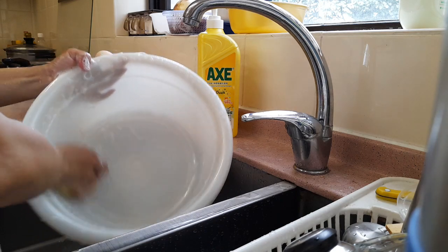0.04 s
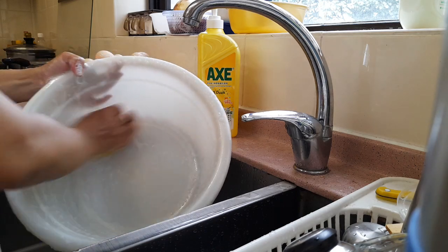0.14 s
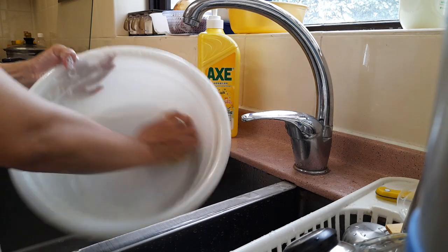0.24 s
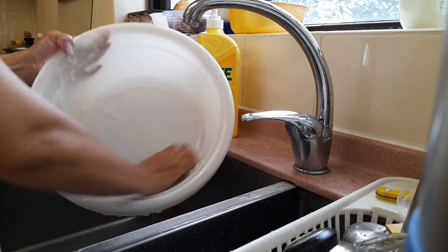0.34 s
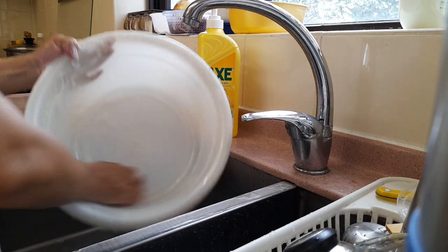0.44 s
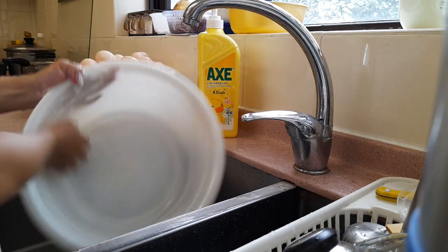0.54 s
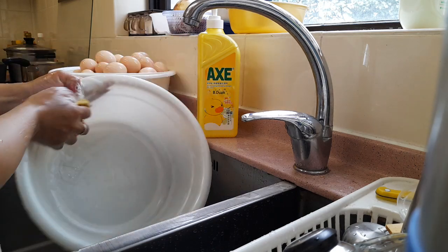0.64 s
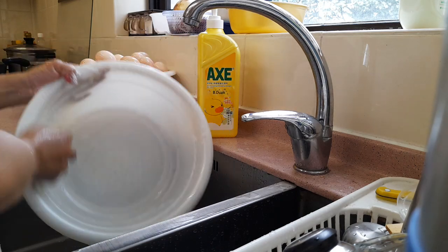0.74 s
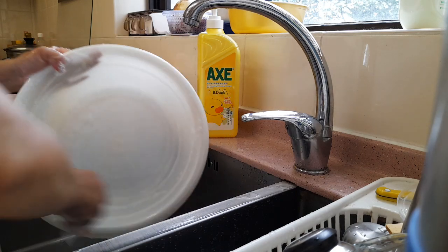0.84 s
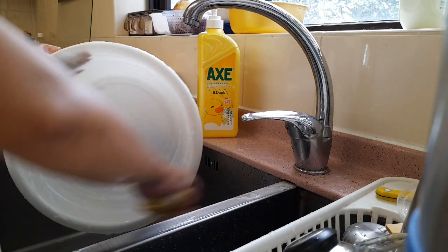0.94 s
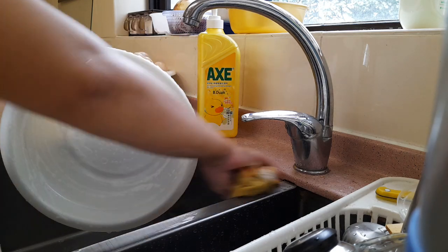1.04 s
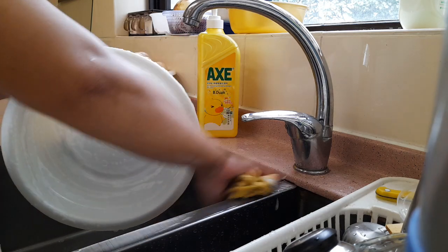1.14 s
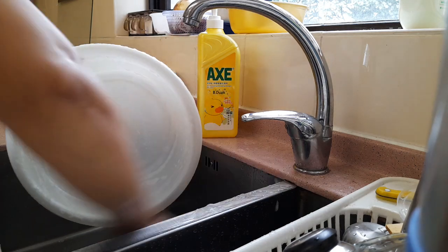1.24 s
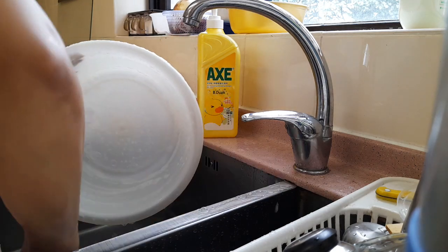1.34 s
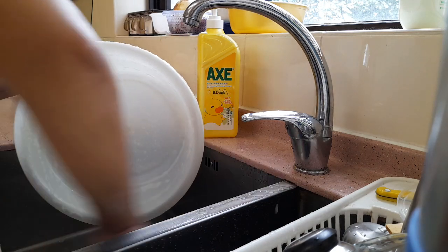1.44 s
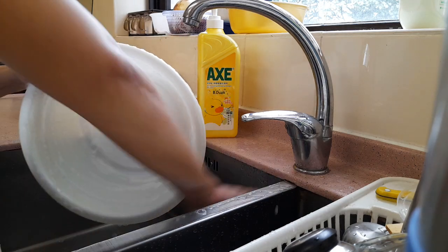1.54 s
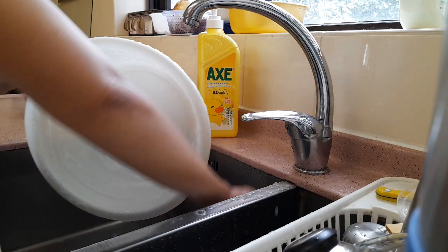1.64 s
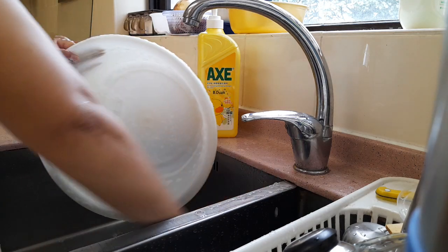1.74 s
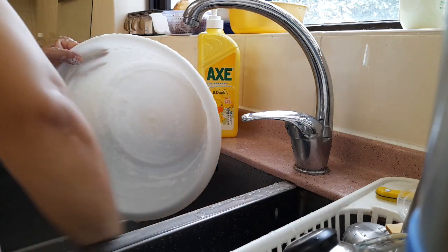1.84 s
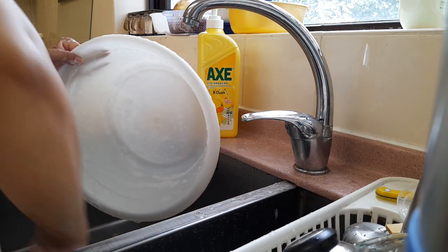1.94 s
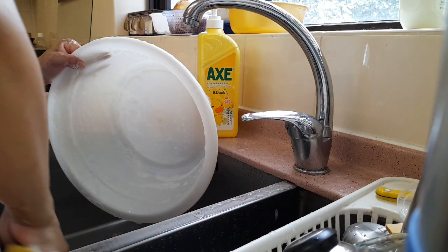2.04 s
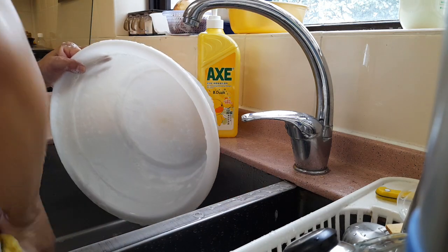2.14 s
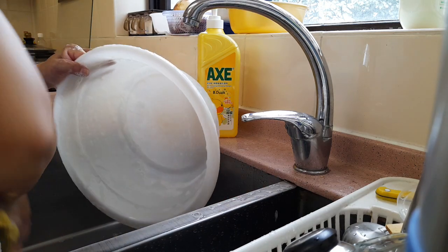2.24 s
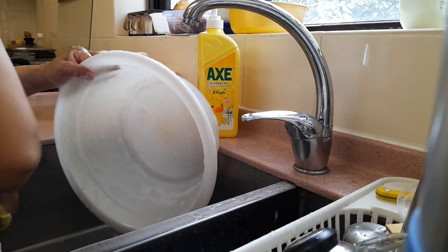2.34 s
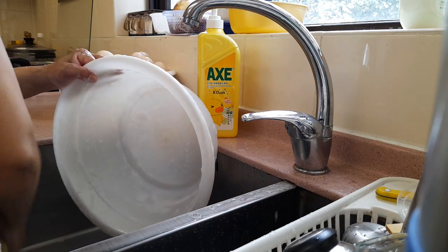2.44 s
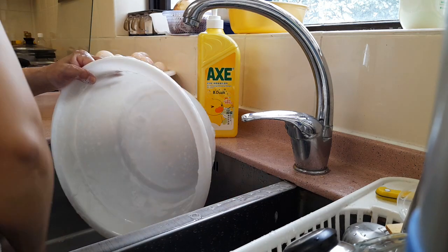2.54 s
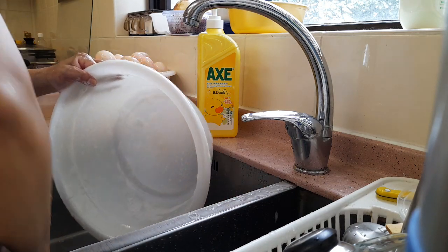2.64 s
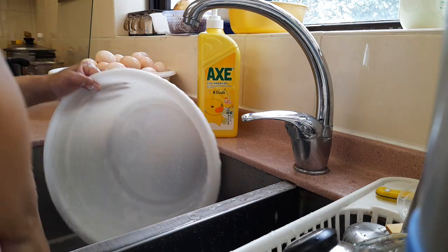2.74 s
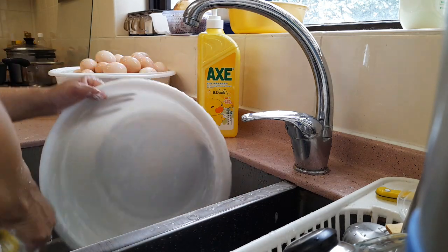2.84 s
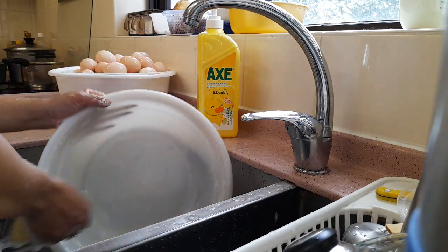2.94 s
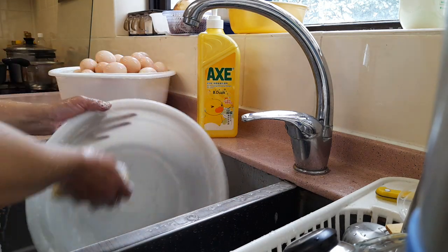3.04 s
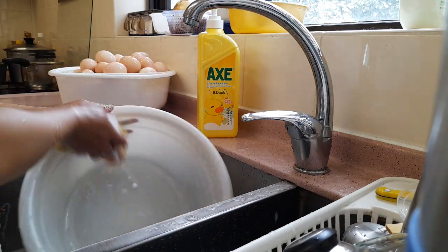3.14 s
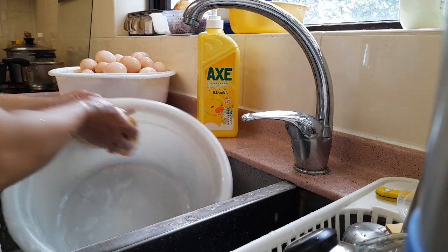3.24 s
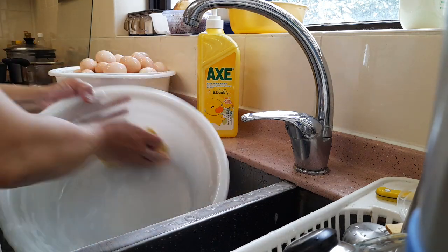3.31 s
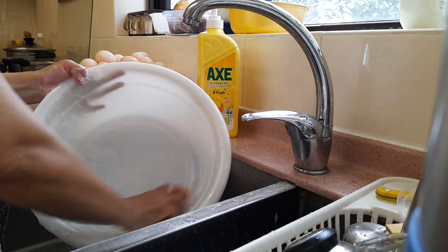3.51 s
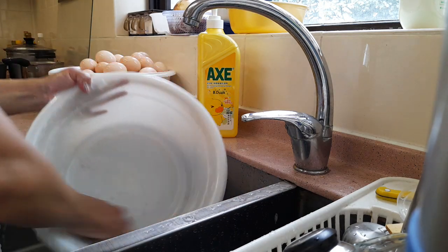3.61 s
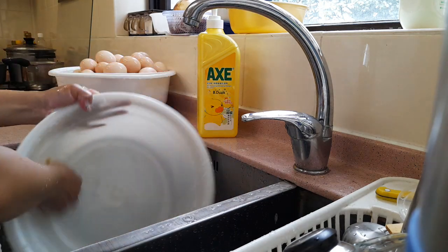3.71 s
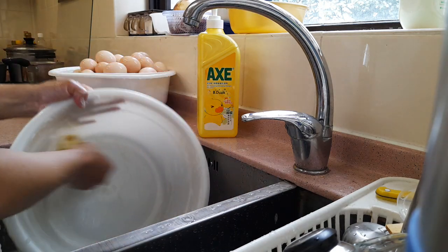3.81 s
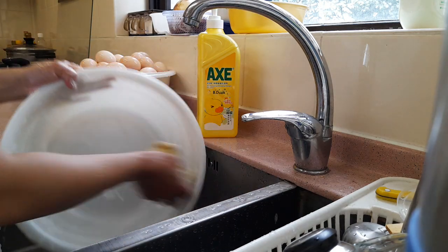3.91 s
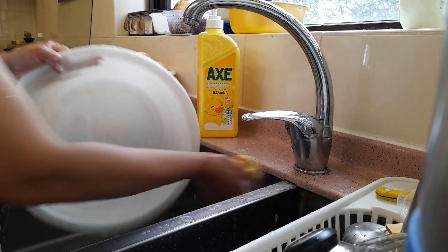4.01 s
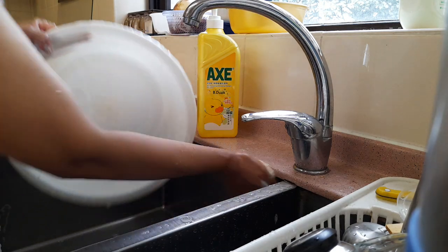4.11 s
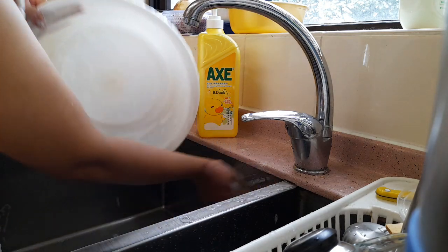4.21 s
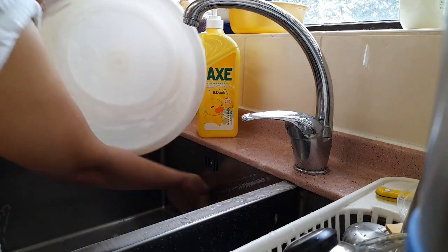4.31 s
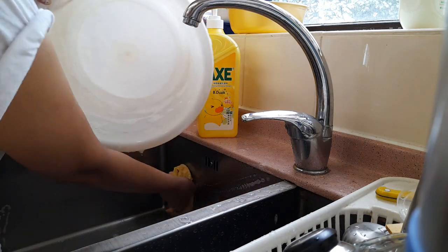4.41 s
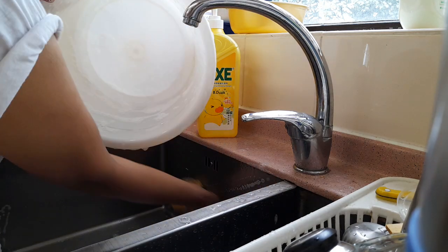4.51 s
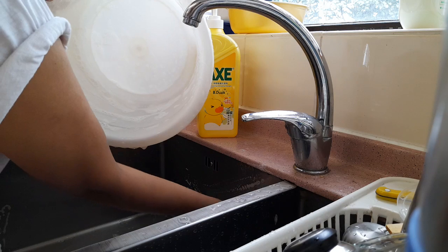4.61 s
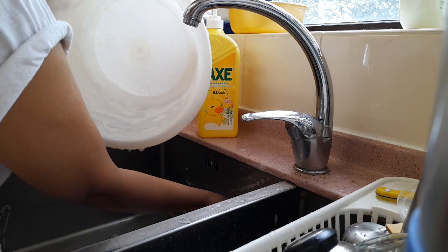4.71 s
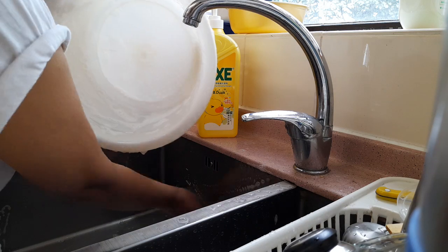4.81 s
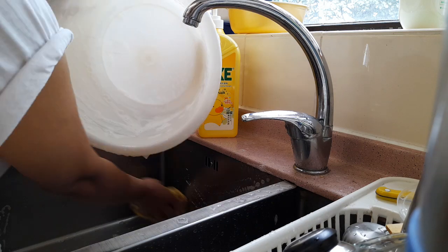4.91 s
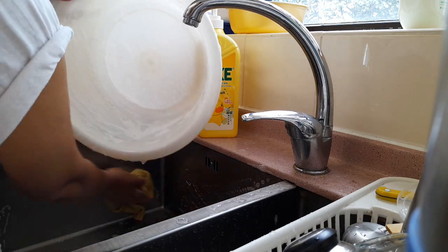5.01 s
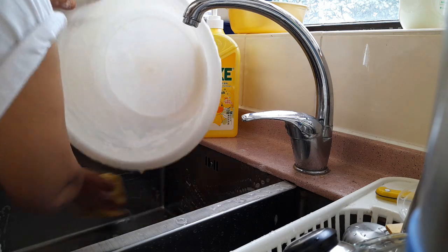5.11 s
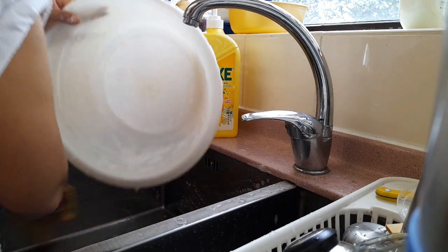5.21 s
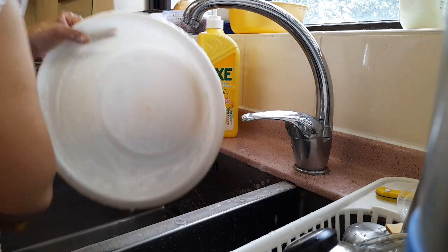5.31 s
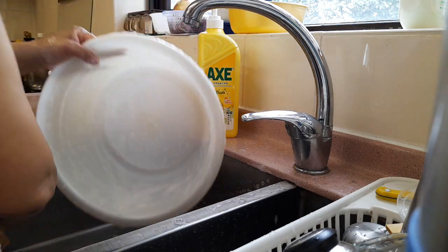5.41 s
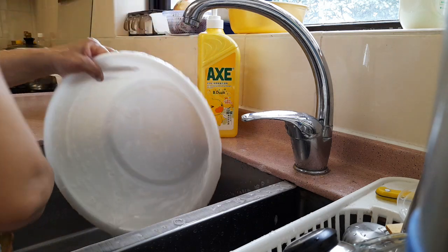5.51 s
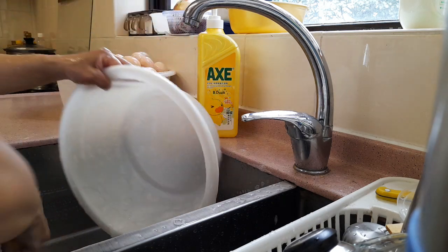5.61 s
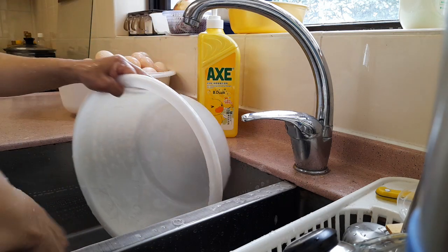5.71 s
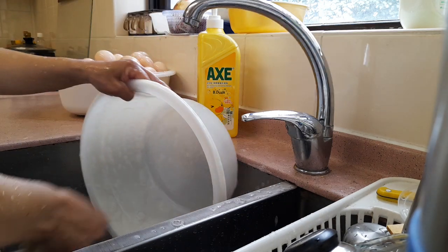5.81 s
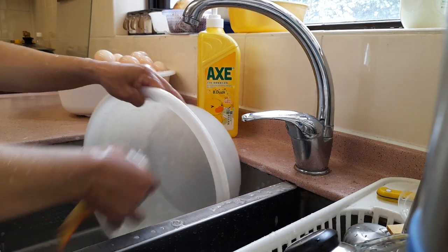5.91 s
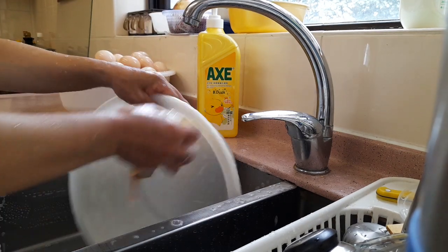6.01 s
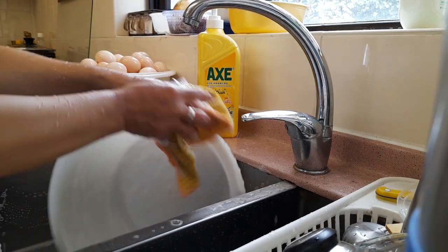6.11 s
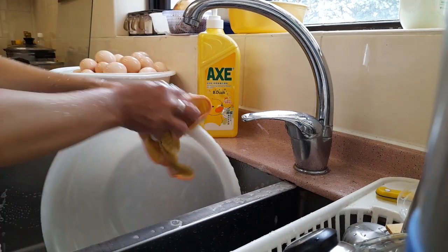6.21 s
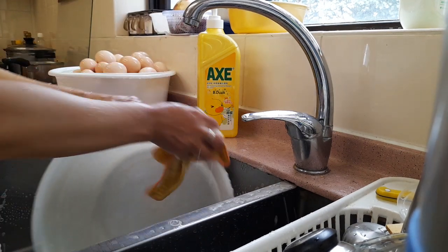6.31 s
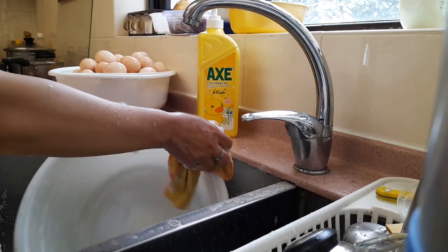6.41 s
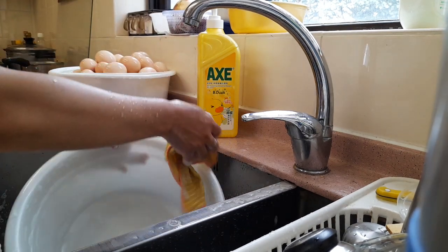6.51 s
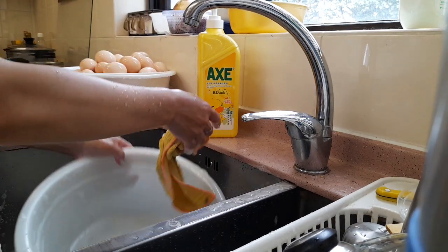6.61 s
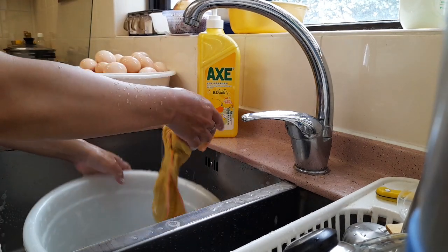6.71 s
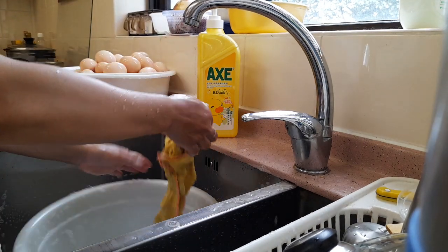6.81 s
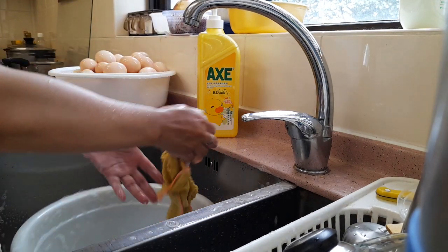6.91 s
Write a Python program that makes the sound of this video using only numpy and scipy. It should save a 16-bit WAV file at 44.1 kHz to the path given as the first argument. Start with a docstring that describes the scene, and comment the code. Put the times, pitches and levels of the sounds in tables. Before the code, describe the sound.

A wet soapy cloth rubs and squelches on a plastic basin in a kitchen sink, with hollow knocks and thumps over a steady fan drone.

```python
"""A fan drones across a tiled kitchen, under faint hiss and a thin electrical whine: shaped noise and a wavering sine.
Close by, a soapy cloth rubs, squelches and catches on a wet plastic basin: crackles and bursts of noise.
The rim bumps the steel sink, a hand thumps the basin, and it is set down with hollow knocks: dying modes and noise.
The room's tail follows the cloth sounds and sharp clacks; background, ringing modes and rattle stay dry.
Two slightly unequal microphones hear it in stereo, alike in the bass and apart in the treble."""
import sys
import numpy as np
from scipy import signal
from scipy.fft import rfft, irfft, next_fast_len
from scipy.io import wavfile
from scipy.ndimage import map_coordinates

SR = 44100
rng = np.random.default_rng(int(sys.argv[2]) if len(sys.argv) > 2 else 0)


def dump(signal):
    """Clip the signal to [-1, 1] and save it as 16-bit WAV at the path in sys.argv[1]."""
    limited = np.clip(np.atleast_2d(signal).T, -1, 1)
    pcm = np.round(limited * 32767).astype(np.int16)
    wavfile.write(sys.argv[1], SR, pcm)


N = 306495

# Spectrum of the fan's drone. Each row: frequency in Hz, relative density in dB per Hz.
DRONE_SPECTRUM = [(20, -32), (35, -24), (48, -1), (58, 3.5), (80, -11.5), (105, -3.5), (190, -4),
                  (250, -10.5), (320, -7.5), (420, -18.5), (540, -14), (900, -13.5), (1400, -24.5),
                  (3000, -60)]
# Spectrum of the faint hiss. Each row: frequency in Hz, relative density in dB per Hz.
HISS_SPECTRUM = [(1200, 2), (2000, 7.5), (2600, 0), (3400, -1), (4200, -2), (5380, -5.5), (5545, 5),
                 (5720, -6), (7800, -6), (8600, -10.5), (9700, -2), (12500, -8.5), (14200, 4), (15200, -44)]
# Rubs of the cloth on the wall or of the basin on the sink.
# Each row: start in seconds, length in seconds, peak level in dB before the uneven grip.
STROKES = [(.144, 0.15, -48), (.28, 0.17, -49), (0.578, 0.11, -51.5), (2.038, 0.11, -54.5),
           (2.855, 0.19, -52.5), (3.13, 0.41, -49), (3.322, 0.36, -47), (5.667, 0.52, -50),
           (6.15, 0.25, -45), (6.66, 0.35, -46)]
# Spectrum of the rubbing cloth. Each row: frequency in Hz, relative density in dB per Hz.
CLOTH_SPECTRUM = [(150, 22.5), (500, 13.5), (1300, 10), (2500, 2.5), (4500, -1), (8000, -7), (10500, -4),
                  (15000, -25)]
# Squelches of the wet cloth, smack and foam each with a further fixed gain.
# Each row: time of the smack in seconds, base level in dB, foam spray over that base in dB.
SQUELCHES = [(.185, -55, 12), (.302, -51.5, 12), (.602, -60, 17), (1.119, -42.5, 7.5), (1.4046, -46, 9),
             (1.6404, -47, 12), (2.125, -47.5, -10), (2.4058, -41.5, 9.5), (2.5566, -58.5, 19),
             (3.2197, -43.5, 12.5), (3.5, -46, 9.5), (3.7773, -47, -9), (3.989, -44, 9), (4.11, -44, 2),
             (4.593, -52.5, 4), (5.018, -52.5, 4), (5.0352, -46, 15.5), (5.3373, -47, 13)]
# Spectrum of the cloth's smack. Each row: frequency in Hz, relative density in dB per Hz.
SMACK_SPECTRUM = [(200, -20), (600, 8), (1500, 1.5), (2500, -1), (4500, -4), (7000, -17), (15000, -72)]
# Spectrum of the foam spray. Each row: frequency in Hz, relative density in dB per Hz.
SPRAY_SPECTRUM = [(1500, -42), (4000, -7.5), (6000, -3.5), (8500, -3.5), (10500, 1), (13000, -6),
                  (15500, -12.5)]
# Places where the cloth catches and stutters on. Each row: start in seconds, level of the first slip in dB.
CATCHES = [(.177, -31.5), (0.306, -37), (.348, -36), (1.119, -46), (5.018, -36.5), (5.776, -38),
           (5.99, -44)]
# Spectrum of one gritty slip. Each row: frequency in Hz, relative density in dB per Hz.
CATCH_SPECTRUM = [(100, -22), (220, 3), (480, 11), (700, -8), (920, 9.5), (1250, 2), (1750, -4),
                  (2400, -15), (4000, -14), (7000, -19), (10500, -10), (15000, -22)]
# Bumps against the sink.
# Each row: start in seconds, floor clunk in dB, side ring in dB, clack in dB, pitch factor of the rings.
BUMPS = [(1.3138, -20, -29, -37, 1), (5.720, -27.5, -31.5, -38.5, 1.03), (6.868, -26.5, -33, -40, .88)]
# Modes of the sink's floor. Each row: frequency in Hz, mean level in dB, t60 in seconds.
SINK_FLOOR_MODES = [(114.2, -1, .31), (179, -1, .21), (221, -3, .1), (292.4, -6, .31), (335, .5, .16),
                    (399, -18, .13)]
# Modes of the sink's side. Each row: frequency in Hz, mean level in dB, t60 in seconds.
SINK_SIDE_MODES = [(537, 1.5, 0.19), (569, -8.5, 0.34), (641, -5, 0.29), (1031, -10, 0.078),
                   (1104, -31, 0.14), (1378, -1.5, 0.077)]
# Spectrum of the low rattle. Each row: frequency in Hz, relative density in dB per Hz.
RATTLE_SPECTRUM = [(50, -20), (110, -3), (200, 1), (330, 3), (460, -3.5), (720, -8), (920, -2.5),
                   (1100, -8), (2000, -21), (5000, -45)]
# Spectrum of the sharp clack. Each row: frequency in Hz, relative density in dB per Hz.
CLACK_SPECTRUM = [(300, -9), (720, -6), (920, 0), (1100, -5), (1500, -1), (2050, -9), (2500, -9),
                  (3100, -14), (4400, -12), (7000, -19), (10500, -17), (15500, -21)]
# Pushes of the hand on the basin; near half pitch the bottom flexes in a low thud.
# Each row: start in seconds, level in dB before a fixed gain, pitch factor, ring length factor.
THUMPS = [(1.425, -18, 0.89, 0.079), (1.654, -20, .93, 0.26), (1.664, -31.5, 1.33, .4),
          (1.755, -23.5, .53, 0.091), (2.064, -28, 0.95, 0.14), (2.407, -32.5, .97, 0.18),
          (3.984, -35, 1.03, 0.36), (4.107, -23.5, 1.016, 0.59), (6.251, -17, 0.5, 0.16),
          (6.561, -5, 0.98, .31), (6.781, -29, .97, 0.48)]
# Modes of the basin's wall. Each row: frequency in Hz, mean level in dB, t60 in seconds; blows scale pitch and t60.
WALL_MODES = [(176, -7, .3), (190, -3, .33), (214, 0, .7), (238, -17, .2), (286, -15, .35), (332, -13, .25)]
# The basin lands on its rim.
# Each row: start in seconds, force in dB, rim clatter over the force in dB, pitch factor of wall and bottom.
KNOCKS = [(2.407, -52, 9, .97), (3.3125, -18.5, -10, .99), (3.365, -34, 4, 1), (6.139, -25, -5, 1.02),
          (6.191, -23, -6.5, 1), (6.2755, -30, -8, .89), (6.512, -17.5, -7, .94), (6.561, -28.5, -8, 1),
          (6.640, -33, -6, 1.1), (6.781, -37, 0, .97), (6.857, -21.5, -3, .94)]
# Modes of the basin's rim. Each row: frequency in Hz, mean level in dB, t60 in seconds.
RIM_MODES = [(469, -2, .5), (540, -8, .3), (669, 1, .55), (842, -9, .25), (904, -6, .3), (1457, -13, .3),
             (1559, -14, .3), (1727, -13, .3), (2337, -14, .35), (4670, -20, .3)]
# Modes of the flat bottom. Each row: frequency in Hz, mean level in dB, t60 in seconds; blows scale pitch and t60.
BOTTOM_MODES = [(51.5, -13, 0.64), (78.3, 1.5, 0.94), (102.5, 0.5, 0.77), (117.3, -1.5, 0.98), (138, 3, 1)]
# Decay of the tiled kitchen. Each row: frequency in Hz, t60 in seconds.
KITCHEN_T60 = [(200, 0.52), (1000, 0.39), (4000, 0.47), (14000, 0.32)]
# How alike the two microphones hear. Each row: frequency in Hz, left-right likeness from -1 to 1.
LIKENESS = [(60, 0.94), (190, 0.98), (300, 0.57), (640, 0.21), (1400, 0.11), (3000, -0.16), (15000, -0.24)]
# Balance of the two microphones. Each row: frequency in Hz, left minus right in dB.
BALANCE = [(100, -2.5), (280, -3.5), (500, 0), (1000, -3.5), (2000, -4), (4000, -1), (8000, -2), (13000, 3)]

DRONE_DB, DRONE_RISE_DB_PER_S = -41.5, .35  # level at the start; the drone creeps up
HISS_DB = -56.5
WHINE_HZ, WHINE_DB, WHINE_DRIFT_HZ = 13295, -61, 7  # mean pitch, level, slow wander of the pitch
SQUELCH_T60_S, BRUSH_DB = 0.081, -14  # dying of a squelch; the brushing just before it
SLIP_GAP_S, SLIP_LOSS_DB = .016, 1.5  # mean time between slips; each is weaker than the last
CRACK_DB, WALL_DB, BOOM_DB, THUD_DB = -2, 3, -9, 4.5  # parts of a knock, over its force
HELD_RING = 0.89  # the holding hand shortens the ring by this factor
TOP_HZ = 15900  # upper band limit of the microphones
LIFE = 3 * SR // 4  # longest sound of one blow or rub, in samples
AGE = np.arange(LIFE) / SR  # seconds since its start


def amp(db):
    """Decibels to gain."""
    return 10 ** (np.asarray(db) / 20)


def unit(x):
    """Scale to rms 1."""
    return x / np.sqrt(np.mean(x ** 2) + 1e-20)


def along(points, hz):
    """Read (Hz, value) points on a log frequency axis."""
    f, value = np.transpose(points)
    return np.interp(np.log(hz + 1), np.log(f + 1), value)


def wobble(rate):
    """A smooth random curve with rate knots a second."""
    knots = rng.standard_normal(int(N * rate / SR) + 4)
    return map_coordinates(knots, [np.arange(N) * rate / SR])


def decay(t60):
    """A fall of 60 dB every t60 seconds."""
    return np.exp(-np.log(1000) * AGE / max(t60, 1e-3))


def filtered(x, gain):
    """x times a gain that depends on frequency."""
    n = x.shape[-1]
    m = next_fast_len(n + 4096)
    return irfft(rfft(x, m) * gain(np.fft.rfftfreq(m, 1 / SR)), m)[..., :n]


def spread(hz):
    """Angle between the middle and the sides that gives the two microphones their likeness."""
    return np.arccos(np.clip(along(LIKENESS, hz), -1, 1)) / 2


def noise(spectrum, size):
    """Diffuse stereo noise of rms 1: alike in the bass, little related in the treble."""
    def gain(hz):
        return amp(along(spectrum, hz)) * [np.cos(spread(hz)), np.sin(spread(hz))]

    mid, side = filtered(rng.standard_normal((2, size)), gain)
    return unit(np.array([mid + side, mid - side]))


def burst(spectrum, t60):
    """A dying burst of noise: modes too dense to tell apart."""
    fall = decay(t60)[:SR // 3]
    return noise(spectrum, size=len(fall)) * fall


def crackle(spectrum, size, rate):
    """Tiny bursting soap films, rate a second: random pulses of uneven size, shaped to rms 1."""
    pops = (rng.random(size) < rate / SR) * rng.standard_normal((2, size))
    return unit(filtered(pops, lambda hz: amp(along(spectrum, hz))))


def ring(modes, contact, length=1, pitch=1):
    """Struck modes of wavering pitch; the higher ones reach the two microphones out of step."""
    out = np.zeros((2, LIFE))
    for hz, db, t60 in modes:
        level_shift, skew = np.clip(rng.standard_normal(2), -1.5, 1.5)
        lag = skew * spread(hz)
        waver = .005 * np.interp(AGE, np.linspace(0, 1, 40), rng.standard_normal(40))
        turns = hz * pitch * np.cumsum(1 + waver) / SR
        phase = 2 * np.pi * turns + np.array([[lag], [-lag]])
        out += amp(db + level_shift) * decay(t60 * length) * np.sin(phase.astype(np.float32))
    onset = 1 - np.exp(-AGE / max(contact, 1e-4))  # a longer contact in seconds is softer
    return out * onset


def kitchen(x, wet_db):
    """Add the tiled room's tail: noise in which each frequency dies at its own speed."""
    start = noise([(120, -25), (400, 0), (16000, 0)], size=SR // 2)
    hz, t, bands = signal.stft(start, SR, nperseg=256)
    fall = np.exp(-np.log(1000) * t / along(KITCHEN_T60, hz)[:, None])
    tail = signal.istft(bands * fall, SR, nperseg=256)[1]
    tail = tail / np.linalg.norm(tail[0])
    return x + amp(wet_db) * signal.fftconvolve(x, tail, axes=1)[:, :x.shape[1]]


def add(track, s, sound):
    """Mix a sound into the track at s seconds."""
    part = track[:, max(round(s * SR), 0):][:, :sound.shape[1]]
    part += sound[:, :part.shape[1]]


def background():
    """A fan's drone that creeps up, a faint hiss and a thin sine whine of wavering pitch and level."""
    drone_db = DRONE_DB + DRONE_RISE_DB_PER_S * np.arange(N) / SR
    drone = amp(drone_db + .8 * wobble(5)) * noise(DRONE_SPECTRUM, size=N)
    hiss = amp(HISS_DB + .6 * wobble(4)) * noise(HISS_SPECTRUM, size=N)
    pitch = WHINE_HZ + WHINE_DRIFT_HZ * wobble(1) + 4 * wobble(40)
    # the moving arms shift the whine's short standing waves differently at each microphone
    swell_db = 2.2 * np.array([wobble(12), wobble(12)])
    phase_shift = .35 * np.array([wobble(6), wobble(6)])
    tone = np.sin(2 * np.pi * np.cumsum(pitch) / SR + phase_shift)
    whine = np.sqrt(2) * amp(WHINE_DB + swell_db) * tone  # the root of two makes the level an rms
    return drone + hiss + whine


def rubbing():
    """Each rub swells and fades, gripping unevenly on the soapy plastic."""
    pressure = np.zeros((1, N))
    for s, length, db in STROKES:
        progress = np.minimum(AGE / max(length, .05), 1)
        swell = np.sin(np.pi * progress ** .7)  # rises faster than it fades
        add(pressure, s, amp(db) * swell[None])
    grip = amp(3 * wobble(70))
    return kitchen(pressure * grip * crackle(CLOTH_SPECTRUM, size=N, rate=1500), wet_db=0.0)


def squelches():
    """The cloth brushes the plastic, smacks on it and squeezes out a spray of foam."""
    out = np.zeros((2, N))
    t = np.arange(-.03, .15, 1 / SR)  # seconds from the smack
    squeeze = np.exp(-np.abs(t) * np.log(1000) / SQUELCH_T60_S)
    squeeze = squeeze * np.where(t < 0, amp(BRUSH_DB), 1)
    for s, db, foam_db in SQUELCHES:
        spray = amp(foam_db - 7.0) * crackle(SPRAY_SPECTRUM, size=len(t), rate=8000)
        smack = amp(6.5) * crackle(SMACK_SPECTRUM, size=len(t), rate=7000)
        add(out, s + t[0], amp(db) * (spray + smack) * squeeze)
    return kitchen(out, wet_db=-1.5)


def catches(count=4):
    """Where the cloth sticks, it slips on in a few uneven, gritty scrapes, each weaker than the last."""
    out = np.zeros((2, N))
    for s, db in CATCHES:
        gaps = SLIP_GAP_S * (.5 + rng.random(count))
        delays = np.cumsum(gaps) - gaps[0]
        for k, delay in enumerate(delays):
            add(out, s + delay, amp(db - SLIP_LOSS_DB * k) * burst(CATCH_SPECTRUM, t60=0.023))
    return kitchen(out, wet_db=-6.0)


def bumps():
    """The held basin nudges the steel sink, whose floor and side modes answer with a dull clunk."""
    sharp, body = np.zeros((2, 2, N))
    for s, floor_db, side_db, clack_db, pitch in BUMPS:
        add(body, s, amp(floor_db) * ring(SINK_FLOOR_MODES, contact=0.0024, pitch=pitch))
        add(body, s, amp(side_db) * ring(SINK_SIDE_MODES, contact=0.00068, pitch=pitch))
        add(body, s, amp(floor_db - 12.5) * burst(RATTLE_SPECTRUM, t60=0.46))
        add(sharp, s, amp(clack_db) * burst(CLACK_SPECTRUM, t60=0.063))
    return kitchen(sharp, wet_db=0) + body


def thumps():
    """A hand pushes the basin: the wall gives a damped tone, or the bottom flexes in a low thud."""
    out = np.zeros((2, N))
    for s, db, pitch, length in THUMPS:
        # the low thud takes the same modes at about half pitch
        add(out, s, amp(db + 3) * ring(WALL_MODES, contact=.008, length=length, pitch=pitch))
    return out


def knocks():
    """Force sets crack, wall, boom and thud; each landing adds its own amount of rim clatter and rattle."""
    sharp, body = np.zeros((2, 2, N))
    for s, force_db, clatter_db, pitch in KNOCKS:
        add(sharp, s, amp(force_db + CRACK_DB) * burst(CLACK_SPECTRUM, t60=0.082))
        rim = amp(clatter_db - 9.0) * ring(RIM_MODES, contact=0.00043)
        wall = amp(WALL_DB) * ring(WALL_MODES, contact=0.0055, length=HELD_RING, pitch=pitch)
        boom = amp(BOOM_DB) * ring(BOTTOM_MODES, contact=0.0087, length=HELD_RING, pitch=pitch)
        thud = amp(THUD_DB) * ring([(86, 0, 0.1)], contact=0.00029)  # its weight lands dead
        add(body, s, amp(force_db) * (rim + wall + boom + thud))
        add(body, s, amp(force_db + clatter_db - 2.4) * burst(RATTLE_SPECTRUM, t60=0.53))
    return kitchen(sharp, wet_db=-3) + body


def scene():
    """Everything that sounds around the sink."""
    cloth = rubbing() + squelches() + catches()
    basin = bumps() + thumps() + knocks()
    return background() + cloth + basin


def record(dry):
    """Two slightly unequal microphones with a bass roll-off and a band limit."""
    def response(hz):
        tilt = amp(along(BALANCE, hz) * np.array([[.5], [-.5]]))  # half the difference to each side
        return tilt * (hz < TOP_HZ)

    bass_cut = signal.butter(5, 45, "highpass", fs=SR, output="sos")
    return filtered(signal.sosfilt(bass_cut, dry), response)


dry = scene()
out = record(dry)
dump(out)
```